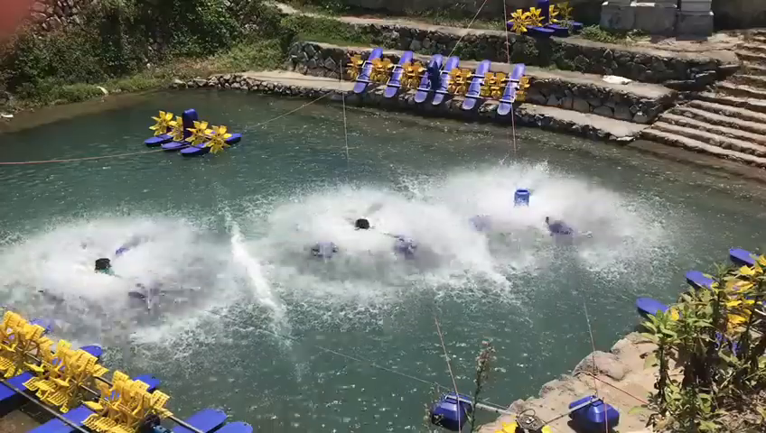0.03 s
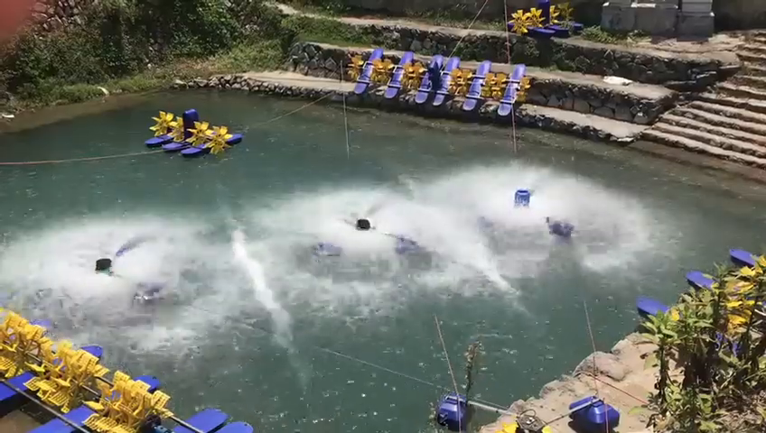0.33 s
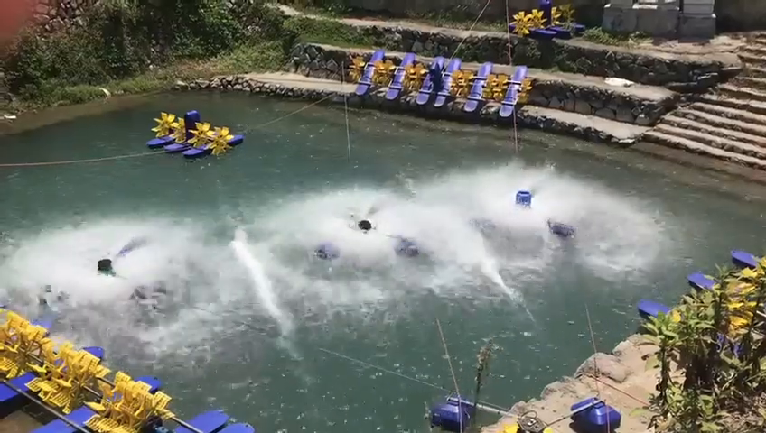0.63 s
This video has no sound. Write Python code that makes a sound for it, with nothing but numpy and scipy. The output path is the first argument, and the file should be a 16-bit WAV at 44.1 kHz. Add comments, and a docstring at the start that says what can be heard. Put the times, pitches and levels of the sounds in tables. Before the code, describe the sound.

Paddlewheel aerators churn a fish pond some metres away, making a dense, steady roar of falling water with bubbles, drops and small slaps. Motors hum faintly beneath, and light wind puffs rumble on the microphone.

```python
"""A dense roar of falling water: three aerators churn a fish pond some metres from the bank.
The thrown water lands as merged spray, ringing bubbles, ticking drops and slaps, with a few
heavy splats, near plinks and one brief, bright shower on top. The motors hum faintly
beneath, and light puffs of wind rumble on the microphone."""
import sys
import numpy as np
from scipy import signal
from scipy.fft import rfft, irfft
from scipy.io import wavfile

SR = 44100
rng = np.random.default_rng(int(sys.argv[2]) if len(sys.argv) > 2 else 0)


def wav_out(sig):
    """Save sig, one row per channel (or a flat mono array), as 16-bit PCM at SR to the path in sys.argv[1]."""
    wavfile.write(sys.argv[1], SR, np.round(np.clip(np.atleast_2d(sig).T, -1, 1) * 32767).astype(np.int16))


N = 176400
TIME, FREQS = np.arange(N) / SR, np.maximum(np.arange(N // 2 + 1) * SR / N, 1)
DROP_SPREAD_DB = 2

# Tone colour of the falling water as heard through the microphone, including the
# microphone's dips: frequency_hz, gain_db
WATER = [(50, -18.5), (100, -9), (160, -8.5), (200, -5), (250, -4), (335, 0.45), (420, -3.5), (445, -9),
         (520, -12), (630, -4), (800, -1.2), (940, 0), (1150, -5.5), (1300, -3.5), (1550, -0.7),
         (1800, -1.6), (2200, -5), (2650, -2), (3100, -7.5), (3400, -5), (3900, -10), (4250, -9.5),
         (4700, -11), (4920, -13.5), (5200, -10.5), (5900, -11), (6600, -13.5), (7200, -13.5),
         (7620, -15.5), (8100, -13), (8900, -8), (9600, -13)]


def roar(level_db=-0.5, bands=14, flicker_hz=16):
    """Countless far drops merge into noise, each band flickering by itself."""
    # Far spray's EQ, on top of the WATER curve: frequency_hz, gain_db
    spray_eq = [(100, 4.5), (200, -2), (500, -2), (1000, -1.5), (2000, -1), (4000, -0.5), (7000, 2),
                (9500, -4)]
    spectrum = rfft(rng.standard_normal(N)) * from_db(at_hz(spray_eq, FREQS))
    band = np.digitize(FREQS, np.geomspace(250, 9000, bands - 1))
    depths_db = np.linspace(0.92, 1.35, bands)  # the treble flickers most
    spray = sum(irfft(spectrum * (band == k), N) * from_db(depth_db * drift(flicker_hz))
                for k, depth_db in enumerate(depths_db))
    return from_db(level_db) * coloured(spray, WATER)


def bubbles(level_db=-8, per_s=1700, ring_cycles=14.4, sizes=48):
    """Trapped air rings briefly at a pitch set by the bubble's size; the finest ones fizz."""
    births = impacts(per_s, spread_db=0.5)
    size_class = rng.integers(0, sizes, N)
    pitches_hz = np.geomspace(555, 9110, sizes)
    rings = sum(hz * ring(births * (size_class == k), hz, ring_cycles / hz)
                for k, hz in enumerate(pitches_hz))
    return from_db(level_db) * coloured(rings, WATER)


def drops(level_db=-10.5, per_s=1600):
    """Single drops tick on the surface."""
    return from_db(level_db) * coloured(impacts(per_s, DROP_SPREAD_DB), WATER)


def slaps(level_db=-12.5, per_s=120, decay_s=0.004):
    """Larger lumps of water land, each a brief burst of spatter."""
    hits = impacts(per_s, spread_db=1)
    power = signal.lfilter([1], [1, -np.exp(-2 / (decay_s * SR))], hits ** 2 + 1e-18)
    return from_db(level_db) * coloured(np.sqrt(power) * rng.standard_normal(N), WATER)


def splats(decay_s=0.005, width_octaves=0.74, size=2048):
    """A heavy lump hits with a sharp burst around the pitch of the hollow it makes."""
    # The heaviest landings: start_s, attack_level_db, centre_hz
    landings = [(0.112, -28, 1800), (0.326, -43, 1500), (0.471, -26.5, 2200), (0.706, -28, 2000),
                (0.736, -27, 1600), (0.801, -32, 1080), (1.017, -34, 1700), (1.141, -28.5, 1600),
                (1.788, -28, 1900)]
    out, age = np.zeros(N + size), np.arange(size) / SR
    freqs = np.maximum(np.fft.rfftfreq(size, 1 / SR), 1)
    for start_s, level_db, centre_hz in landings:
        colour = 1 / (1 + (np.log2(freqs / centre_hz) / width_octaves) ** 2)
        burst = rms_one(irfft(rfft(rng.standard_normal(size)) * colour))
        start = int(start_s * SR)
        out[start:start + size] += from_db(level_db) * burst * np.exp(-age / decay_s)
    return out[:N]


def plinks(level_db=-36, per_s=70, low_hz=948, high_hz=3694, decay_cycles=12, rise=0.05):
    """Near bubbles plink above the roar, each gliding up as it surfaces and dies away."""
    count, size = 800, 2048
    out, age = np.zeros(N + size), np.arange(size) / SR
    starts_s = np.cumsum(rng.exponential(1, count)) / per_s
    for start_s, smallness in zip(starts_s, rng.random((count, 2))[:, 0]):
        if start_s < TIME[-1]:
            hz = low_hz * (high_hz / low_hz) ** smallness
            life = age * hz / decay_cycles
            tone = np.sin(2 * np.pi * hz * age * (1 + rise * life / 2))
            start = int(start_s * SR)
            out[start:start + size] += from_db(level_db) * tone * np.exp(-life)
    return out[:N]


def shower(level_db=-46, per_s=720, pitch_hz=3440, peak_s=0.72, half_width_s=0.11):
    """Fine drops of like size patter down for a moment and ring at one bright pitch."""
    patter = rms_one(ring(impacts(per_s, DROP_SPREAD_DB), pitch_hz, t60_s=0.013))
    swell = np.exp(-((TIME - peak_s) / half_width_s) ** 2 / 2)
    return from_db(level_db) * patter * swell


def motors(waver_db=5.5, waver_rate_hz=2.75, wander_hz=0.89):
    """Mains hum and gear whine, wavering at random like machines beating against each other."""
    # Motor tones: pitch_hz, level_db
    tones = [(100, -55.5), (190, -61), (300, -56.5), (427, -63), (951, -56.5)]
    out = 0
    for pitch_hz, level_db in tones:
        phase = 2 * np.pi * np.cumsum(pitch_hz + wander_hz * drift(waver_rate_hz)) / SR
        waver = from_db(waver_db * drift(waver_rate_hz))
        out = out + from_db(level_db) * rms_one(np.sin(phase) * waver)
    return out


def wind(breeze_db=-54, eddy_hz=63, size=16384):
    """Faint turbulence rumbles on the microphone, with puffs above it; smaller eddies sound higher."""
    # Rumble colour for eddies centred on eddy_hz: frequency_hz, gain_db
    rumble = [(15, -46), (28, -28), (40, -5), (64, 2.5), (80, -4.5), (120, -12), (180, -19), (300, -31.5),
              (700, -62.5)]
    # Puffs of wind: peak_s, half_width_s, level_db, centre_hz
    puffs = [(0.186, 0.025, -33, 58), (0.274, .016, -35.5, 56), (0.359, 0.03, -41, 57),
             (0.796, 0.019, -40, 64), (0.843, 0.015, -43, 66), (0.917, .022, -35.5, 72),
             (0.963, 0.014, -44, 58), (1.057, .013, -42, 86), (1.143, .017, -41, 60),
             (1.313, 0.047, -40, 56), (1.617, .018, -38, 85), (2.117, 0.033, -45, 58),
             (2.266, .013, -37.5, 80), (2.364, 0.016, -37, 73), (2.421, 0.013, -34.5, 84),
             (3.116, 0.024, -32, 60), (3.18, 0.021, -32, 56), (3.218, .018, -36, 58),
             (3.527, 0.024, -29, 67), (3.594, 0.028, -37.5, 64), (3.823, 0.026, -43, 66),
             (3.916, 0.021, -40.5, 72)]
    out = np.pad(from_db(breeze_db) * coloured(rng.standard_normal(N), rumble), size // 2)
    from_peak_s = (np.arange(size) - size // 2) / SR
    freqs = np.maximum(np.fft.rfftfreq(size, 1 / SR), 1)
    for peak_s, half_width_s, level_db, centre_hz in puffs:
        swell = np.exp(-(from_peak_s / half_width_s) ** 2 / 2)
        colour = from_db(at_hz(rumble, freqs * eddy_hz / centre_hz))
        eddies = irfft(rfft(rng.standard_normal(size)) * colour)
        puff = rms_one(swell * eddies) * np.sqrt(np.mean(swell ** 2))
        start = int(peak_s * SR)
        out[start:start + size] += from_db(level_db) * puff
    return out[size // 2:size // 2 + N]


def from_db(db):
    """Decibels to gain."""
    return 10 ** (np.asarray(db) / 20)


def rms_one(x):
    """Scale to unit power."""
    return x / np.sqrt(np.mean(x ** 2) + 1e-20)


def at_hz(curve, hz):
    """Read an EQ curve, in dB, on a log-frequency axis."""
    points_hz, gains_db = np.transpose(curve)
    return np.interp(np.log(hz), np.log(points_hz), gains_db)


def coloured(x, curve):
    """Shape a signal with an EQ curve, at unit power."""
    return rms_one(irfft(rfft(x) * from_db(at_hz(curve, FREQS)), N))


def drift(rate_hz):
    """Smooth random modulation at unit power, mostly slower than rate_hz."""
    return rms_one(irfft(rfft(rng.standard_normal(N)) / (1 + (FREQS / rate_hz) ** 2), N))


def impacts(per_s, spread_db):
    """Clicks at random times: many small ones, a few larger."""
    sizes = from_db(spread_db * np.minimum(rng.exponential(1, N), 4.5))
    return sizes * rng.choice([-1, 1], N) * (rng.random(N) < per_s / SR)


def ring(clicks, hz, t60_s):
    """Each click sets a dying sine ringing."""
    radius, angle = 1000 ** (-1 / (t60_s * SR)), 2 * np.pi * hz / SR
    return signal.lfilter([0, np.sin(angle)], [1, -2 * radius * np.cos(angle), radius ** 2],
                          clicks + 1e-18)


def scene():
    """Water, motors and wind, the same in both ears."""
    # How much water the wheels throw: time_s, level_db
    throw = [(0.1, -31), (0.5, -31), (0.85, -31), (1.05, -31), (1.9, -31), (2.55, -31.5), (2.85, -31),
             (3.9, -31)]
    surge_db = 0.15 * drift(rate_hz=25)
    flow = from_db(np.interp(TIME, *np.transpose(throw)) + surge_db)
    churn = flow * (roar() + bubbles() + drops() + slaps())  # these four levels are relative to the flow
    mono = churn + splats() + plinks() + shower() + motors() + wind()
    return np.array([mono, mono])


def record(dry):
    """The sound cuts in abruptly, and a steep low-pass takes off the top."""
    start_s, fade_s, cutoff_hz = 0.082, 0.003, 9720
    opened = dry * np.clip((TIME - start_s) / fade_s, 0, 1)
    return signal.sosfilt(signal.ellip(14, 0.1, 80, cutoff_hz, fs=SR, output="sos"), opened)


dry = scene()
out = record(dry)
wav_out(out)
```